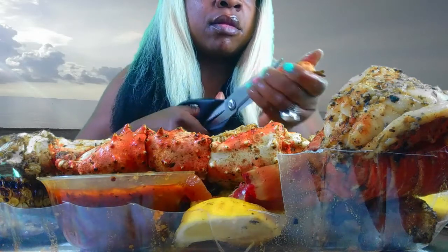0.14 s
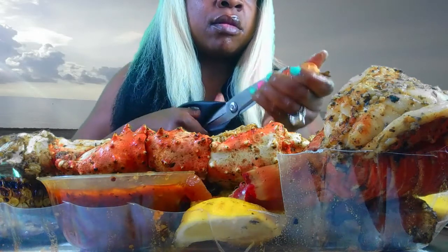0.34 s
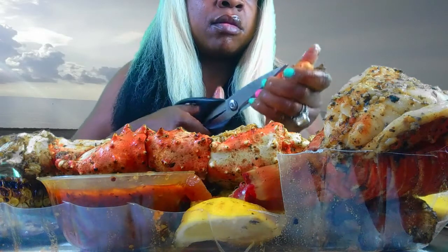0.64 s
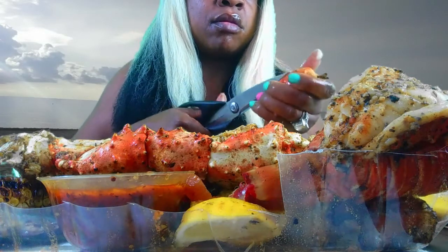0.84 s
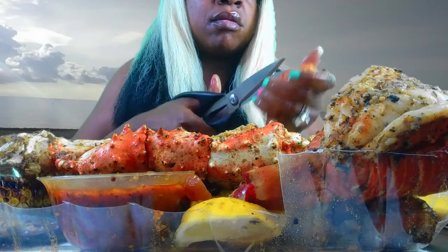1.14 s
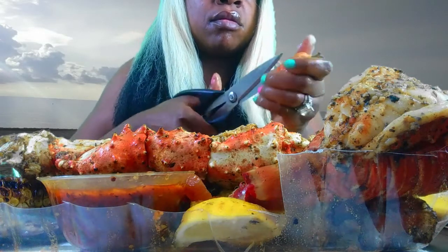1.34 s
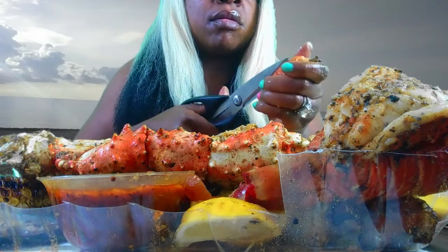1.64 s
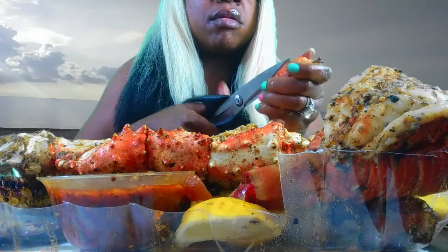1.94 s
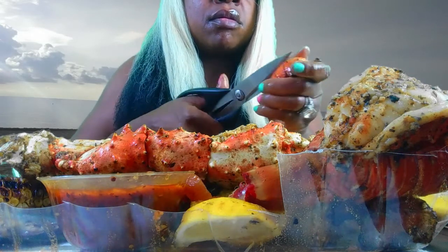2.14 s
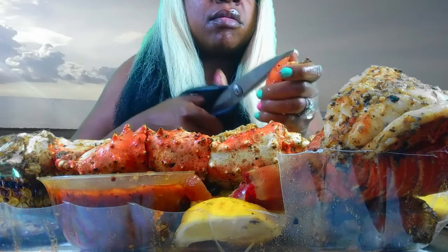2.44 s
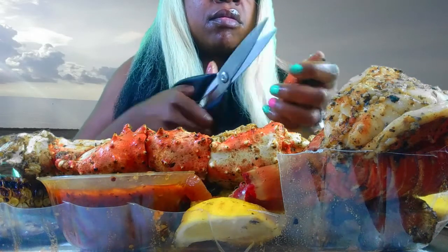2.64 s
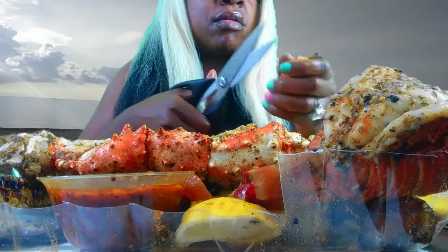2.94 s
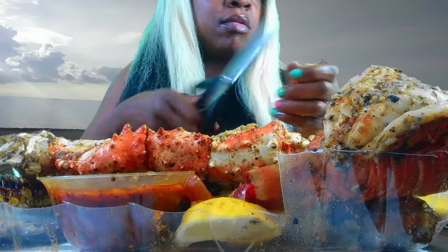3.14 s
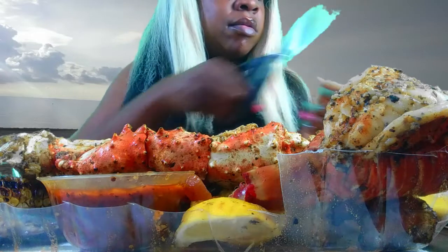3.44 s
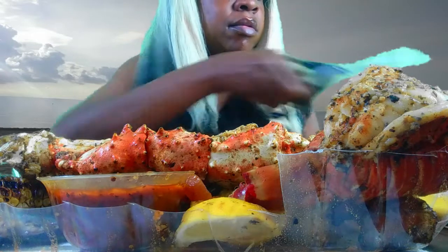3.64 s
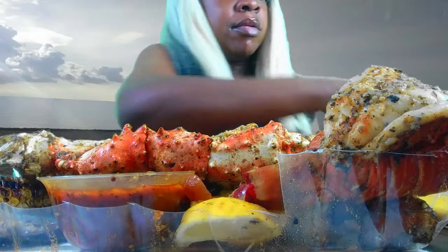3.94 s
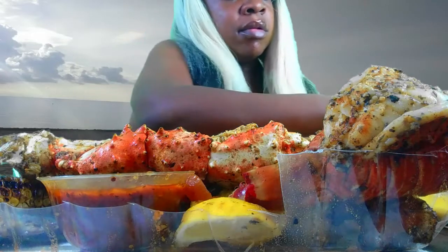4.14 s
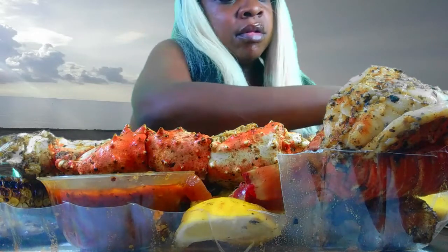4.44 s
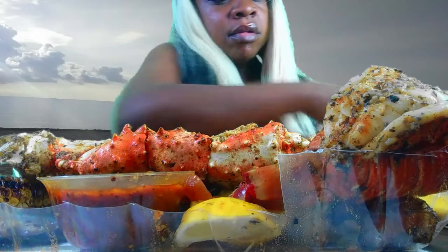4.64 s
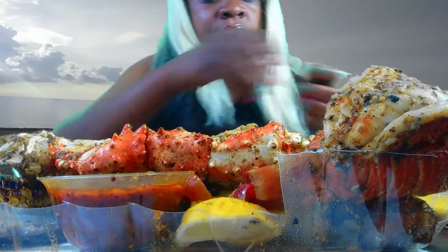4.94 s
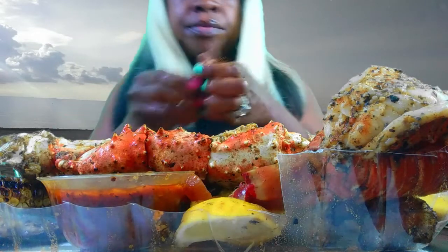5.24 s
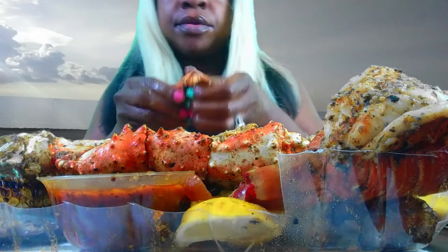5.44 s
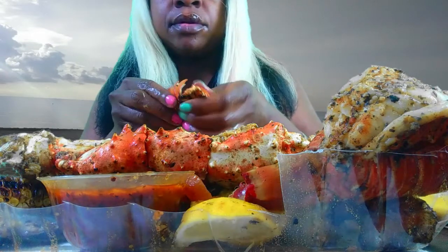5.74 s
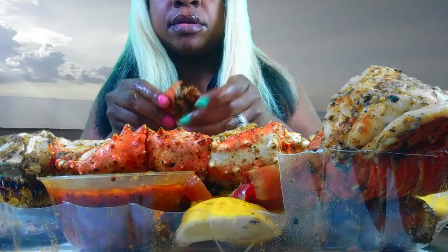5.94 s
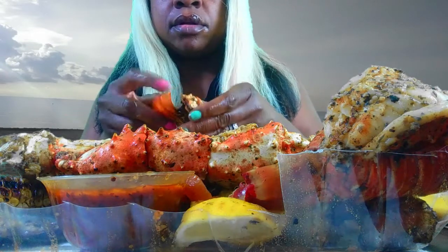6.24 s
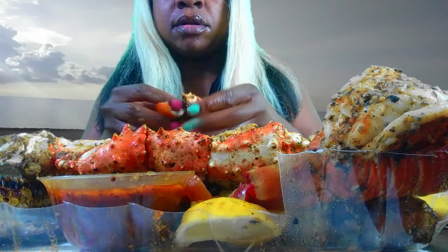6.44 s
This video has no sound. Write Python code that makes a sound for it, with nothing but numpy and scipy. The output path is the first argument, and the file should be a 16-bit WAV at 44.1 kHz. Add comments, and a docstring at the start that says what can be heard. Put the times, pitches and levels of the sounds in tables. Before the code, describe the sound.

Brittle shell snaps and gritty crunches sit slightly left, cut by shears in a small dry room. Three strong snips come with tiny ticks between, then a quiet gap and several knocks on the table, the last loudest. Fingers then break the shell nearer the centre with a few crisp cracks. Beneath it all, a deep muffled motor hum rises and winds down with soft hiss.

```python
"""In a small, dry room, kitchen shears crunch through a lobster shell close to a stereo microphone.
Three hard snips and some small bites are bursts of tiny fractures and sharp cracks in a ringing shell.
The shears are laid on the table with a few knocks, filtered thuds with ringing modes; then fingers crack
the creaking shell open. Noise tails make the room. An engine hums through the walls in orders of its
shaft rate, swells and slowly runs down; shaped noise makes a faint recorder hiss that steps up near 3.8 s."""
import sys
import numpy as np
from scipy import signal
from scipy.fft import rfft, irfft
from scipy.io import wavfile
from scipy.ndimage import uniform_filter1d

SR = 44100
rng = np.random.default_rng(int(sys.argv[2]) if len(sys.argv) > 2 else 0)


def put_to_file(sound):
    """Save the sound as 16-bit audio at rate SR, in the file named by the first command-line argument."""
    columns = np.atleast_2d(sound).T  # one column per channel
    safe = np.clip(columns, -1, 1)
    whole_steps = np.round(safe * 32767)
    wavfile.write(sys.argv[1], SR, whole_steps.astype(np.int16))


N = 290191
TIME = np.arange(N) / SR
FILTER_SIZE = 4096
FREQS = np.maximum(np.arange(FILTER_SIZE // 2 + 1) * SR / FILTER_SIZE, 1)
TOP_HZ = 16100

# Levels of close sounds are relative within their layer; each layer has its own gain.
# pan_db is left minus right. treble_slope [dB per octave] acts above 4500 Hz.

# engine speed: s [s], shaft_rate_hz [Hz]
SHAFT_RATE = [(0, 25.31), (.5, 25.34), (1.4, 25.85), (2.1, 24.72), (3.2, 26.3), (3.7, 27.42), (3.95, 28.8),
              (4.45, 28.88), (5.2, 27.3), (5.7, 26), (6.05, 25.71), (6.58, 24.65)]
# level curve of the hum, as engine load: s [s], load_db [dB above idling]
ENGINE_LOAD = [(0, -2), (1.9, -1), (2.5, 4.5), (2.9, -1), (3.74, 0.5), (3.93, 8.5), (4.4, 13), (5.4, 11.5),
               (5.85, 10), (6.58, 8)]
# engine orders: multiple [of the shaft rate], idle_db [dB], growth [dB per dB of load],
# swell_share [fraction of the swells]
ENGINE_ORDERS = [(2, -63.5, 0.74, 0.15), (3, -71, 1.41, 0), (4, -67.5, 0.99, 0.11), (5, -74, 1.566, 0.87),
                 (6, -79, 0.37, 0.065), (7, -89.5, 1.35, 0.74), (8, -99.5, 1, 0), (9, -89, 0.85, 0.69),
                 (10, -87, 0.49, 0.69), (11, -91.5, 1.18, 0)]
# room resonances that an order booms in: centre_hz [Hz], half_width_hz [Hz], boom_db [dB]
ROOM_BOOMS = [(108.6, 2.9, 5), (176.6, 3.1, 11)]
# two swells of the hum: top_s [s], half_length_s [s], swell_db [dB, scaled by each order's share]
HUM_SWELLS = [(3.972, .15, 19.5), (6.068, 0.2, 13)]
# spectrum of the engine's rumble: hz [Hz], level_db [dB]
RUMBLE_SPECTRUM = [(15, -20.5), (30, -6.5), (48, 8.5), (70, -2.5), (110, 3), (170, -2), (250, -29),
                   (400, -21), (1000, -79.5)]
# spectrum of the recorder hiss: hz [Hz], level_db [dB]
HISS_SPECTRUM = [(30, -6), (150, 9), (250, 8), (400, 3.5), (800, -1), (1600, -3), (3000, -9), (5000, -15.5),
                 (9000, -19.5), (16000, -17)]
RUMBLE_IDLE_DB = -65
HISS_BASE_DB, HISS_PER_CURVE_DB = -71.5, 0.48  # level where the hum's curve is 0; dB per dB of that curve

# likeness of the two channels in diffuse sound: hz [Hz], correlation [-1 to 1]
CHANNEL_LIKENESS = [(100, 0.79), (250, 0.54), (500, 0.51), (1000, -0.031), (2300, -0.018), (4000, -0.11),
                    (7000, 0.084), (16000, 0)]
# share that the walls send back: hz [Hz], level_db [dB]
WALL_RETURN = [(100, -5.5), (8000, -0.5), (16000, 0)]
ROOM_T60_S, ROOM_TREBLE_T60_S, SCATTER_S = 0.26, 0.28, 0.004
# the shell is cut at the left, then brought to the middle:
# s [s], right_lag_s [s, delay of the right capsule], room_db [dB]
SHELL_PLACE = [(2.7, 0.00019, 3.5), (5.3, 0.000075, 2.5)]

# blades or fingers crushing the shell: start_s [s], length_s [s], level_db [dB],
# ring_hz [Hz], treble_slope [dB per octave]
CRUNCHES = [(0.125, 0.049, -59.5, 3300, -3.5), (0.326, 0.029, -53, 3300, 3), (0.358, 0.051, -59.5, 3060, 2),
            (0.547, 0.041, -59, 3330, -5), (0.609, 0.22, -77, 3340, -2), (0.901, 0.024, -45.5, 2130, -0.5),
            (1.334, 0.025, -57, 2300, -5), (1.447, 0.1, -58.5, 2360, -16), (1.497, 0.073, -53, 2280, -7.5),
            (2.122, 0.047, -57, 2869, -5), (2.284, .01, -59, 2130, -29), (2.379, 0.039, -44, 2360, 0),
            (2.408, 0.0315, -42, 2400, 0), (2.453, .017, -38, 2600, -9), (2.483, 0.04, -51, 2520, -6.5),
            (5.623, 0.015, -47, 3600, 6), (5.86, 0.15, -74.5, 2380, -26.5), (6.428, .15, -75, 2517, -12)]
# spectrum of the shell around its ring: hz [Hz], level_db [dB]
SHELL_SPECTRUM = [(100, -30), (430, -6.5), (660, 3), (1000, 1), (1550, -4.5), (2000, 5.5), (2800, 0.5),
                  (3500, 1.5), (5000, -1.5), (7000, -2), (10000, -5.5), (16000, -8)]
SHELL_WIDTH_HZ = 480
CRUNCH_UPPER_DB, CRUNCH_PAN_DB = -1, 3  # upper_db as in the cracks

# knocks of the shears and hands: s [s], level_db [dB], low_hz [Hz, bass corner],
# contact_hz [Hz, treble corner of the contact]
KNOCKS = [(0.2461, -54, 720, 1130), (2.506, -37.5, 670, 1208), (4.2364, -40, 400, 1930),
          (4.383, -38, 370, 1580), (4.4456, -22.5, 306, 2431), (4.452, -23.5, 297, 990),
          (4.6395, -13.5, 135, 10940), (4.6425, -28, 171, 3023), (4.663, -29.5, 204, 428)]
# ringing of the table, dish and steel blades: hz [Hz], level_db [dB], t60_s [s]
TABLE_MODES = [(138, 4.5, 0.2), (243, -5.5, 0.24), (339.6, 6, 0.21), (382.5, 2.5, 0.19), (528, -5, 0.21),
               (623, -7.5, 0.29), (773, -11.5, 0.32), (980, 13, 0.04), (1032, -0.5, 0.22),
               (1320, -19, 0.08), (1415, 10, 0.12), (1580, -10, 0.26), (2745, -27.5, 0.62),
               (3130, -2.5, 0.124)]
# spectrum of a thud: hz [Hz], level_db [dB]
THUD_SPECTRUM = [(100, -9.5), (230, -1.5), (290, -15.5), (380, 6), (680, -5), (1150, -0.5), (1750, -0.5),
                 (2300, -7), (3000, -4), (4200, -15.5), (5500, -23), (9000, -28), (16000, -34)]
TABLE_PAN_DB = 3

# single shell cracks: s [s], level_db [dB], ring_hz [Hz], upper_db [dB, of which 0.36 lifts
# the range above 2 kHz over that below 1.2 kHz], treble_slope [dB per octave]
CRACKS = [(0.336, -23.5, 3370, -0.5, 3), (0.375, -30.5, 3780, -9, 3.5), (0.5582, -57, 3280, -12, -9),
          (0.6127, -52, 3850, 21, -2.5), (0.673, -54.5, 3700, -8, -7), (0.7745, -61, 4200, -5, 2),
          (0.9075, -36.5, 3130, 0, -3), (0.9205, -42, 2300, 8, 14), (1.109, -56.5, 2980, 10, -8),
          (1.344, -51, 2440, 0, -10), (1.4448, -51.5, 2930, -14, -5), (1.764, -49, 4430, 3, 8.5),
          (2.3823, -34.5, 2280, 3, 5), (2.4098, -25.5, 4570, 1, -2.5), (2.4185, -27, 2230, -11, -31),
          (3.9347, -55.5, 3200, -8, -20), (4.2337, -52.5, 4260, -10, -5), (5.412, -48.5, 2500, -6, -34),
          (5.435, -42, 2630, -3, -16), (5.561, -45, 3100, 3, -7), (5.6259, -28, 3680, -5, 13),
          (5.656, -42, 3240, 2, 3), (5.7442, -47.5, 2970, -2, 6.5)]
CRACK_PAN_DB = 9
SECOND_BREAK_S, SECOND_BREAK_DB = 0.0085, -10  # after and relative to the first break

# faint creaks of the held shell under strain: start_s [s], length_s [s], level_db [dB],
# ring_hz [Hz], treble_slope [dB per octave]
STRAINS = [(1.577, 0.94, -85, 2280, 8), (5.301, 1.1, -81.5, 2520, -29.5)]


def undb(db):
    """Decibels to gain."""
    return 10 ** (np.asarray(db) / 20)


def unit(x):
    """Scale to rms 1."""
    return x / np.sqrt(np.mean(x ** 2))


def along(points, hz):
    """Read (Hz, value) points on a log-frequency axis."""
    f, value = np.transpose(points)
    return np.interp(np.log(np.maximum(hz, 1)), np.log(f), value)


def response(gain):
    """Causal minimum-phase impulse response of unit energy, shaped by the gain at FREQS."""
    cepstrum = irfft(np.log(gain + 1e-9))
    cepstrum[1:FILTER_SIZE // 2] *= 2
    cepstrum[FILTER_SIZE // 2 + 1:] = 0
    h = irfft(np.exp(rfft(cepstrum)))
    return h / np.linalg.norm(h)


def add(track, s, sound, pan_db):
    """Mix a sound into the rows (left, right, feed to the room) at time s."""
    i = max(int(s * SR), 0)
    part = sound[:max(N - i, 0)]
    track[:, i:i + len(part)] += undb([pan_db / 2, -pan_db / 2, 0])[:, None] * part


def walk(rate):
    """Slow random wandering with rms near 1, renewed at the given rate in Hz."""
    k = int(SR / rate)
    steps = np.repeat(rng.standard_normal(N // k + 1), k)
    return unit(uniform_filter1d(uniform_filter1d(steps, k), k)[:N])


def diffuse(count, spectrum=None):
    """Stereo noise whose two channels are alike by a share that depends on frequency."""
    hz = np.arange(count // 2 + 1) * SR / count
    alike = np.clip(along(CHANNEL_LIKENESS, hz), -.99, .99)
    mid, side = rfft(rng.standard_normal((2, count))) * np.sqrt([1 + alike, 1 - alike])
    colour = 1 if spectrum is None else undb(along(spectrum, hz))
    return unit(irfft(np.array([mid + side, mid - side]) * colour, count))


def room(track, lag_s, wet_db, early_db):
    """Sound reaches the left capsule first; nearby dishes scatter it at once, then the walls answer."""
    t = np.arange(SR // 2) / SR
    noise = diffuse(len(t))
    low = signal.sosfiltfilt(signal.butter(2, 4500, fs=SR, output="sos"), noise)
    high = noise - low
    tail = low * undb(-60 * t / ROOM_T60_S) + high * undb(-60 * t / ROOM_TREBLE_T60_S)
    paths = rfft(tail * (1 + undb(early_db) * np.exp(-t / SCATTER_S)))
    # so many paths add up that no broad band is favoured
    paths /= np.sqrt(uniform_filter1d(np.abs(paths) ** 2, size=121, axis=1))
    hz = np.arange(paths.shape[1]) * SR / len(t)
    tail = irfft(paths * undb(along(WALL_RETURN, hz)))[:, :SR // 3]
    direct = np.array([track[0], np.interp(TIME - lag_s, TIME, track[1])])
    return direct + undb(wet_db) * signal.fftconvolve(track[2:], tail, axes=1)[:, :N]


def shell_place():
    """Where the shell is held over time: lag between the capsules and level of the room."""
    s, lag_s, wet_db = np.transpose(SHELL_PLACE)
    return np.interp(TIME, s, lag_s), np.interp(TIME, s, wet_db)


def shell(ring_hz, upper_db, treble_slope, ring_db):
    """Response of the hollow shell: one broad ring on its spectrum, tilted by upper band and treble."""
    ring = 1 + undb(ring_db) / np.hypot(1, 2 * (FREQS - ring_hz) / SHELL_WIDTH_HZ)
    upper = upper_db * along([(1200, 0.32), (2000, 0.68)], FREQS)
    treble = treble_slope * np.log2(np.maximum(FREQS / 4500, 1))
    return response(ring * undb(along(SHELL_SPECTRUM, FREQS) + upper + treble))


def fractures(count, rate, spread_db):
    """Tiny fractures at random moments (rate per second), most of them weak, a few strong."""
    chance = rng.random((count, 3))
    breaks = chance[:, 0] < rate / SR
    sizes = undb(-spread_db * np.log(np.maximum(chance[:, 1], .03)))
    return breaks * sizes * np.sign(chance[:, 2] - .5)


def engine(load_db):
    """Only the engine's low orders and its rumble pass the walls; all grow with the load."""
    shaft_hz = np.interp(TIME, *np.transpose(SHAFT_RATE))
    turn = 2 * np.pi * np.cumsum(shaft_hz) / SR
    swell_db = sum(db * np.exp(-((TIME - s) / length) ** 2) for s, length, db in HUM_SWELLS)
    hum = 0
    for multiple, idle_db, growth, share in ENGINE_ORDERS:
        k = round(multiple)
        # an order swells as it slides through a resonance of the room
        boom_db = sum(db / (1 + ((k * shaft_hz - centre) / width) ** 2)
                      for centre, width, db in ROOM_BOOMS)
        level_db = idle_db + growth * load_db + share * swell_db + boom_db + 2.2 * walk(4.015)
        phase = k * turn + 2 * np.pi * rng.random() + 0.3 * walk(13)
        hum = hum + undb(level_db) * np.sqrt(2) * np.sin(phase)
    rumble = undb(RUMBLE_IDLE_DB + load_db) * diffuse(N, RUMBLE_SPECTRUM)
    return hum * undb([[.4], [-.4]]) + rumble


def recorder_hiss(curve_db):
    """A faint recorder hiss, wavering slightly; it steps up near 3.8 s, steered by the hum's curve."""
    level_db = HISS_BASE_DB + HISS_PER_CURVE_DB * curve_db + 0.11 * walk(4.4)
    return undb(level_db) * diffuse(N, HISS_SPECTRUM) * undb([[.7], [-.7]])


def crunches():
    """While the blades or fingers press, a front of tiny fractures runs through the shell."""
    track = np.zeros((3, N))
    for s, length, db, ring_hz, treble_slope in CRUNCHES:
        count = int(length * SR)
        pressure = signal.windows.tukey(count, .25)
        grains = fractures(SR // 4, rate=2000, spread_db=3.4)[:count]
        grains = unit(grains * pressure[:SR // 4])
        body = shell(ring_hz, CRUNCH_UPPER_DB, treble_slope, ring_db=10.5)
        add(track, s, undb(db) * signal.fftconvolve(grains, body), CRUNCH_PAN_DB)
    return undb(-3.5) * room(track, *shell_place(), early_db=3)


def table_ring():
    """Decaying modes of table, dish and blades, each with a random phase; unit energy."""
    t = np.arange(SR // 3) / SR
    ring = sum(undb(db - 60 * t / t60) * np.sin(2 * np.pi * (hz * t + rng.random()))
               for hz, db, t60 in TABLE_MODES)
    return ring / np.linalg.norm(ring)


def knocks():
    """Each blow thuds and rings the table; soft contacts lack treble, light ones lack bass."""
    thuds, rings = np.zeros((2, 3, N))
    thud = response(undb(along(THUD_SPECTRUM, FREQS)))
    for s, db, low_hz, contact_hz in KNOCKS:
        softness = np.hypot(1, (FREQS / contact_hz) ** 4)
        lightness = np.hypot(1, (low_hz / FREQS) ** 3)
        contact = response(1 / softness / lightness + undb(-41))
        blow = signal.fftconvolve(thud, contact)
        force = undb(db) / np.linalg.norm(blow)
        add(thuds, s, force * blow, 0)
        add(rings, s, force * signal.fftconvolve(table_ring(), contact), 0)
    heard = room(thuds, lag_s=0.00025, wet_db=3.5, early_db=14.5) + undb(-1.0) * rings[:2]
    return undb(16.0) * heard * undb([[TABLE_PAN_DB / 2], [-TABLE_PAN_DB / 2]])


def snap(splinter_db, decay_s, rate):
    """One sharp impact with a quickly fading spray of smaller fractures; unit energy."""
    t = np.arange(FILTER_SIZE // 4) / SR
    spray = fractures(len(t), rate, spread_db=0.96) * np.exp(-t / decay_s)
    push = undb(splinter_db) * spray / np.linalg.norm(spray)
    push[0] += 1
    return push / np.linalg.norm(push)


def cracks():
    """The shell gives way suddenly, rings, and breaks once more a moment later and weaker."""
    track = np.zeros((3, N))
    for s, db, ring_hz, upper_db, treble_slope in CRACKS:
        # a harder break bends the whole shell and rings it more;
        # so does a clean one with few bright splinters
        ring_db = 17 + 0.64 * (db + 39) - 0.49 * treble_slope
        body = shell(ring_hz, upper_db, treble_slope, ring_db)
        for late_s, drop_db in (0, 0), (SECOND_BREAK_S, SECOND_BREAK_DB):
            push = snap(splinter_db=3.0, decay_s=0.001, rate=13000)
            crack = undb(db + drop_db) * signal.fftconvolve(push, body)
            add(track, s + late_s, crack, CRACK_PAN_DB)
    return undb(14.0) * room(track, *shell_place(), early_db=10.5)


def creaks():
    """Under strain, the held shell ticks faintly at random as sparse fractures set it ringing."""
    track = np.zeros((3, N))
    for s, length, db, ring_hz, treble_slope in STRAINS:
        grains = unit(fractures(N, rate=180, spread_db=5.5))[:int(length * SR)]
        body = shell(ring_hz, CRUNCH_UPPER_DB, treble_slope, ring_db=16)
        add(track, s, undb(db) * signal.fftconvolve(grains, body), CRUNCH_PAN_DB)
    return room(track, *shell_place(), early_db=-8.5)


def scene():
    """Shell, shears and table close by, over the engine's hum and the recorder hiss."""
    load_db = np.interp(TIME, *np.transpose(ENGINE_LOAD))
    background = engine(load_db) + recorder_hiss(load_db)
    return background + crunches() + knocks() + cracks() + creaks()


def record(dry):
    """The recorder cuts the top with a steep low-pass."""
    return signal.sosfilt(signal.ellip(10, .2, 70, TOP_HZ, fs=SR, output="sos"), dry)


dry = scene()
out = record(dry)
put_to_file(out)
```